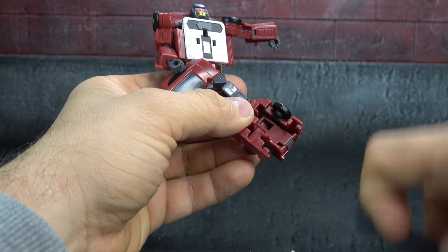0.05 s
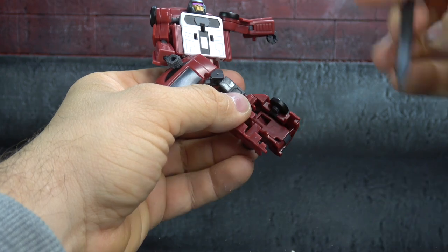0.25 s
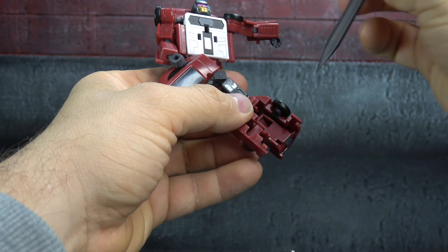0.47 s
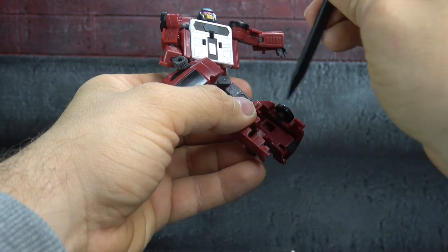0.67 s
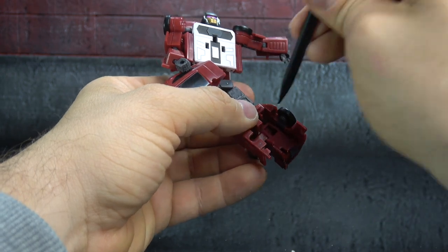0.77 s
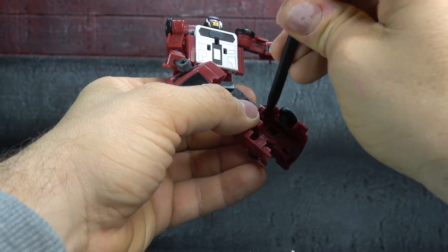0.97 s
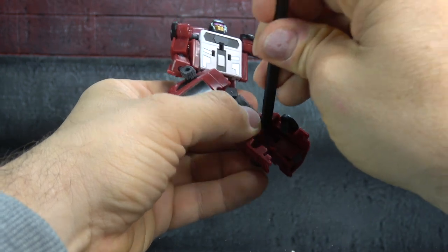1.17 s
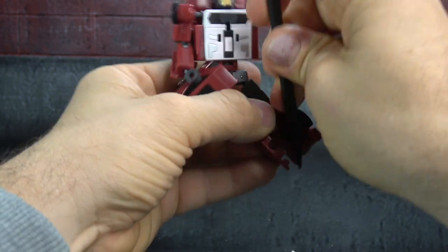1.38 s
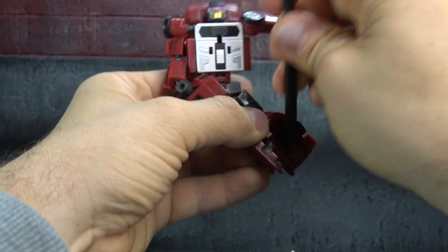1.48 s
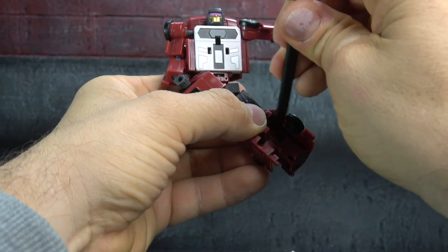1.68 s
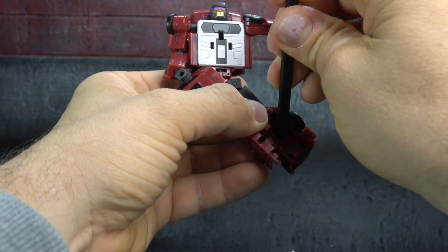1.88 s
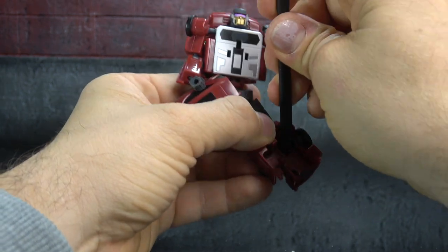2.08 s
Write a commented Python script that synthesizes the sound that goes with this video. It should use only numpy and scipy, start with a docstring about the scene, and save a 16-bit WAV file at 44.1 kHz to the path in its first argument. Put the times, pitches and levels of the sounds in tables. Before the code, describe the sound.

Hard plastic toy leg pried with a pick: faint ticks, one loud snap, then scraping clicks

```python
"""In a small quiet room, close to the microphone, a plastic pick pries at the leg of a hand-held plastic toy
figure. Fingers slide along the pick (coloured noise through its modes) and a fingernail taps; its tip ticks and
scrapes on the hollow foot. Then a tight part snaps free, rings the leg and jolts the hands (low decaying
sines). The part grinds on unevenly (random slips ringing the shell) with smaller clicks and a few dull knocks.
Every contact is a short crack plus decaying modes, weighted and detuned a little differently each time."""
import sys
import numpy as np
from scipy import signal
from scipy.fft import rfft, irfft, next_fast_len
from scipy.io import wavfile
from scipy.ndimage import uniform_filter1d

SR = 44100
rng = np.random.default_rng(int(sys.argv[2]) if len(sys.argv) > 2 else 0)


def unload_wav(signal):
    """Save mono or channel-first audio to the path in sys.argv[1] as 16-bit WAV at rate SR, clipped to [-1, 1]."""
    wavfile.write(
        sys.argv[1],
        SR,
        np.round(np.clip(np.atleast_2d(signal).T, -1, 1) * 32767).astype(np.int16),
    )


N = 94418
TIME = np.arange(N) / SR
HIT_S = .15  # longest ring of one contact
AGE = TIME[:int(HIT_S * SR)]  # seconds since a contact
LEVEL_WINDOW_S = .002  # a click's or knock's level is its energy spread over this window
MODE_SCATTER_DB = 4
GRIPPED_DETUNE, STIFF_DETUNE = .045, .02  # share of a mode's pitch: gripped thin plastic, stiff parts


def amp(db):
    """Decibels to gain."""
    return 10 ** (np.asarray(db) / 20)


def unit(x):
    """Scale to unit energy."""
    return x / np.sqrt(np.sum(x ** 2))


def fade(t, t60):
    """Exponential decay, 60 dB in t60 seconds."""
    return amp(-60 * t / t60)


def add(out, s, x):
    """Mix x into out from s seconds on."""
    i = max(int(s * SR), 0)
    out[i:i + len(x)] += x[:max(N - i, 0)]


def band(x, hz, kind):
    """Gentle low-, high- or band-pass."""
    return signal.sosfilt(signal.butter(2, hz, kind, fs=SR, output="sos"), x)


def log_curve(points, bins, size):
    """Levels in dB at the FFT bins, read along a logarithmic pitch axis through (Hz, dB) points."""
    hz, db = np.array(points, float).T
    bin_hz = np.arange(bins) * SR / size
    return np.interp(np.log(bin_hz + 1), np.log(hz), db)


def colour(x, points):
    """Causal minimum-phase filter through (Hz, dB) points."""
    size = 2 * next_fast_len(len(x))
    cepstrum = irfft(np.log(amp(log_curve(points, size // 2 + 1, size))))
    # folding the cepstrum onto positive time makes the filter causal
    cepstrum[1:size // 2] *= 2
    cepstrum[size // 2 + 1:] = 0
    return irfft(rfft(x, size) * np.exp(rfft(cepstrum)))[:len(x)]


def ring(modes, detune=GRIPPED_DETUNE, count=3):
    """Clusters of close decaying modes; each point of contact weights and detunes them differently."""
    hz, db, t60 = np.repeat(np.array(modes, float), count, axis=0).T[:, :, None]
    scatter_db = MODE_SCATTER_DB * rng.standard_normal(hz.shape)
    weight = amp(db + scatter_db) * rng.choice([-1, 1], hz.shape)
    hz = hz * (1 + detune * rng.uniform(-0.99, 1, hz.shape))
    return unit(np.sum(weight * fade(AGE, t60) * np.sin(2 * np.pi * hz * AGE), axis=0))


def burst(t60):
    """A dense, quickly damped noise burst with an evened spectrum."""
    spectrum = rfft(rng.standard_normal(len(AGE)) * fade(AGE, t60))
    smooth = np.sqrt(uniform_filter1d(np.abs(spectrum) ** 2, size=250))
    return unit(irfft(spectrum / smooth, len(AGE)) * fade(AGE, HIT_S))


# spectrum of the dry crack: pitch_hz [Hz], level_db [dB per Hz, relative]
CRACK_SPECTRUM = [(150, -7), (600, -13), (1200, -11.5), (2000, -14), (3000, -3), (5600, 7), (7000, 2),
                  (8600, 2.5), (12000, -3), (16000, -10)]
CRACK_T60_S = 0.0062  # decay of the noise before its spectrum is evened


def contact(modes, ring_db, body_db, bright_db, edge_db):
    """The plastic's answer to one contact: crack plus modes, hollower, brighter or sharper with the place."""
    crack = unit(colour(burst(CRACK_T60_S), CRACK_SPECTRUM))
    x = crack + amp(ring_db) * ring(modes)
    place = [(500, body_db / 2), (2300, body_db), (4000, 0), (6300, 0.0039), (8300, bright_db), (12000, edge_db)]
    return unit(colour(x, place))


# spectrum of the room's air: pitch_hz [Hz], level_db [dB per Hz, relative]
AIR_SPECTRUM = [(15, -50), (25, 4.5), (180, -2.5), (236, -8.5), (373, -2), (516, -3), (962, -3),
                (1040, -2.5), (1480, -10.5), (2220, -12.5), (2990, -15.5), (6920, -15), (11900, -16.5),
                (16000, -24)]
AIR_DB = -65.5


def air():
    """Steady room noise: white noise coloured to the room's spectrum."""
    x = colour(rng.standard_normal(N), AIR_SPECTRUM)
    return amp(AIR_DB) * x / x.std()


# faint steady tones of the room: pitch_hz [Hz], level_db [dB, RMS]
HUM_TONES = [(498, -78), (1080, -79.5)]


def hum():
    """Constant sines; the square root of two turns RMS level into peak."""
    return sum(amp(db) * np.sqrt(2) * np.sin(2 * np.pi * hz * TIME) for hz, db in HUM_TONES)


# the hands shifting, as a level curve: time_s [s], level_db [dB]
RUSTLE_LEVEL = [(0, -54.5), (.03, -61), (.075, -71), (.125, -61), (.19, -74.5), (.85, -88), (1.14, -67.5),
                (1.3, -70), (1.42, -64.5), (1.65, -72.5), (1.9, -69), (2.14, -69)]


def rustle():
    """The moving hand rustles softly: low band-passed noise riding a level curve."""
    noise = band(rng.standard_normal(N), (120, 380), "bandpass")
    return noise / noise.std() * amp(np.interp(TIME, *np.array(RUSTLE_LEVEL).T))


# spectrum of rubbing skin: pitch_hz [Hz], level_db [dB per Hz, relative]
SKIN_SPECTRUM = [(300, -44), (1500, -5), (3000, 0), (6500, 5), (11000, 3), (16000, -1.5)]
# modes of the pick: pitch_hz [Hz], level_db [dB, relative], t60_s [s]
PICK_MODES = [(3530, 3.5, 0.0067), (4620, 3, 0.012), (4984, 7, 0.017), (8570, 1, 0.011), (11300, 5, 0.015)]
# skin sliding along the pick: strongest_s [s], half_length_s [s], level_db [dB], ring_db [dB against the hiss]
SKIN_SLIDES = [(0.147, 0.046, -55, -25), (0.251, 0.073, -61.5, -14), (0.423, 0.19, -65, -14),
               (0.571, 0.088, -60, -11), (0.599, 0.023, -41, 1), (0.758, 0.045, -52, -31)]
SLIDE_RANGE_DB = 29  # drop from the strongest moment over one half length


def slides():
    """Skin hisses along the pick and makes it sing briefly: swelling noise excites the pick's modes."""
    out = np.zeros(N)
    for s, half, db, ring_db in SKIN_SLIDES:
        hiss = colour(rng.standard_normal(N), SKIN_SPECTRUM)
        hiss *= amp(db - SLIDE_RANGE_DB * np.abs(TIME - s) / half) / hiss.std()
        singing = signal.fftconvolve(hiss, ring(PICK_MODES, STIFF_DETUNE))[:N]
        out += (hiss + amp(ring_db) * singing) / np.hypot(1, amp(ring_db))
    return out


# modes of the shell: pitch_hz [Hz], level_db [dB, relative], t60_s [s]
SHELL_MODES = [(1540, -15, 0.012), (1902, -9.5, 0.033), (2134, -10, 0.036), (3672, 0, 0.031),
               (4660, -5, 0.075), (5290, -2.5, 0.04), (5860, 5.5, 0.048), (6160, 1, 0.034),
               (7450, 0, 0.028), (8550, 3.5, 0.038), (9530, -4, 0.038), (11300, -6, 0.032)]
# fingernail taps, catches and edges striking the plastic: start_s [s], level_db [dB], body_db [dB, hollow body
# around 2 kHz], # bright_db [dB, around 8 kHz], edge_db [dB, above 11 kHz]
CLICKS = [(.1187, -51, -1, 0, 14), (0.126, -50, 9, 7, -5), (0.1387, -46, -7, -2, 18),
          (0.1496, -57, 9, 1, 11), (.351, -55, 19.5, -3, 9), (1.342, -36, 7, 5, 2),
          (1.3488, -45, 4, 2, -8), (1.3574, -25, 13.5, 3, 10.5), (1.3587, -16.5, -23, -0.5, 2),
          (1.3603, -25.5, 3, -1.5, 5), (1.3647, -24, -4, 4, 5), (1.367, -25.5, -2, 3, -7),
          (1.3700, -36, -11, 4, -4), (1.4111, -38, 3, -3, -2), (1.424, -39, -10, -5, 3),
          (1.428, -39.5, 15, 5, -2), (1.431, -37, -2, 11, 7), (1.456, -36, 3, 4, -24),
          (1.466, -38, -1, 18, -13), (1.482, -38.5, -4, 3, -23), (1.4983, -28.5, -5.5, 6.5, -37),
          (1.5115, -30.5, 3, 7.5, -29), (1.5203, -39.5, 1, 2, -5), (1.57, -42, 6, -12, -6),
          (1.5837, -37.5, 7, 13, -4), (1.6992, -39.5, 22, -12, -3), (1.703, -41.5, 19, -10, -12),
          (1.7095, -41, -2, 0, 0), (1.7146, -38, 9, 1, -5), (1.8850, -46, 16, -3, 13),
          (1.8930, -42.5, 10, -6, -16), (1.8946, -37.5, -13, -4, -9), (1.907, -37.5, -6, 0, -10),
          (1.9133, -45.5, 10, -7, -15), (2.0597, -47.5, 5, 6, -2)]
CLICK_RING_DB = -2  # modes against crack


def clicks():
    """Fingernail taps, catches and edges strike the plastic: each click is one crack with the shell's modes."""
    out = np.zeros(N)
    for s, db, body_db, bright_db, edge_db in CLICKS:
        add(out, s, amp(db) * contact(SHELL_MODES, CLICK_RING_DB, body_db, bright_db, edge_db))
    return out * np.sqrt(LEVEL_WINDOW_S * SR)


# knocks of loosely held parts: start_s [s], level_db [dB], pitch_hz [Hz, centre], t60_s [s]
LOOSE_KNOCKS = [(.144, -52, 3280, 0.037), (1.412, -39.5, 1740, 0.045), (1.43, -38.5, 1844, 0.18),
                (1.521, -50, 685, 0.046), (1.535, -42, 1594, 0.035), (1.7027, -44.5, 629, 0.04),
                (1.756, -44, 590, 0.018), (1.7862, -44, 456, 0.088), (1.787, -42, 1019, 0.045),
                (1.798, -48.5, 920, 0.036)]
KNOCK_RING_DB, KNOCK_DB_PER_OCTAVE = -4.5, 17.5  # tone against contact noise; noise slope off the centre
KNOCK_CONTACT_T60_S = 0.048  # decay of the noise before its spectrum is evened


def knocks():
    """Loosely held parts knock, muffled by the hand: noise peaked at one pitch plus a short tone there."""
    out = np.zeros(N)
    for s, db, hz, t60 in LOOSE_KNOCKS:
        slopes = [(hz * 2. ** k, -KNOCK_DB_PER_OCTAVE * abs(k)) for k in range(-4, 5)]
        noise = colour(burst(KNOCK_CONTACT_T60_S), slopes)
        tone = np.sin(2 * np.pi * hz * AGE) * fade(AGE, t60)
        knock = unit(unit(noise) + amp(KNOCK_RING_DB) * unit(tone))
        add(out, s, amp(db) * np.sqrt(LEVEL_WINDOW_S * SR) * knock)
    return out


# modes of the foot under the tip: pitch_hz [Hz], level_db [dB, relative], t60_s [s]
FOOT_MODES = [(1487, -10, 0.034), (2120, 3, 0.015), (2510, -5.5, 0.016), (3330, -10.5, 0.027),
              (5370, -6.5, .012), (6110, 4, 0.013)]
FOOT_BRIGHT_DB = -3.5  # around 8 kHz
# the pick's tip touching the hollow foot: start_s [s], level_db [dB],
# body_db [dB, hollow body around 2 kHz], edge_db [dB, above 11 kHz]
FOOT_TICKS = [(0.9335, -57, 11, -3), (0.9762, -44.5, 1.5, 8.5), (0.982, -47, -9, -20),
              (1.0252, -46.5, 2.5, -6), (1.1432, -49.5, -14, 7.5)]
TICK_RING_DB = -1.5  # modes against crack


def ticks():
    """The pick's tip ticks on the foot: each touch is one crack with the foot's modes."""
    out = np.zeros(N)
    for s, db, body_db, edge_db in FOOT_TICKS:
        add(out, s, amp(db) * contact(FOOT_MODES, TICK_RING_DB, body_db, FOOT_BRIGHT_DB, edge_db))
    return out * np.sqrt(LEVEL_WINDOW_S * SR)


SLIPS_PER_S, CATCHES_PER_S = 1200, 220  # average slips at each point; rate of new catch levels
SCRAPE_RANGE_DB, CATCH_DB = 21.5, 4  # swell from start to strongest; unevenness either way


def scrape(strokes, modes, ring_db, bright_db, points=3):
    """Tiny slips at a few points ring the plastic; each catches and lets go as pressure builds and falls."""
    out = np.zeros(N)
    for start, top, end, db, body_db, edge_db in strokes:
        t = np.arange(start, end, 1 / SR)
        pressure_db = db - SCRAPE_RANGE_DB * np.interp(t, [start, top, end], [1, 0, 1])
        for _ in range(points):
            chance = rng.random(len(t))
            size = rng.standard_normal(len(t))
            catches = rng.uniform(-1.05, 1, SR // 2)
            catch_db = CATCH_DB * np.interp((t - start) * CATCHES_PER_S, np.arange(SR // 2), catches)
            # the gain keeps the summed power independent of slip rate and number of points
            slips = (chance < SLIPS_PER_S / SR) * size * np.sqrt(SR / SLIPS_PER_S / points)
            answer = contact(modes, ring_db, body_db, bright_db, edge_db)
            add(out, start, signal.fftconvolve(slips * amp(pressure_db + catch_db), answer))
    return out


# the pick's tip dragging across the hollow foot: start_s [s], strongest_s [s], end_s [s], level_db [dB],
# body_db [dB, hollow body around 2 kHz], edge_db [dB, above 11 kHz]
FOOT_DRAGS = [(1.04, 1.059, 1.094, -48.5, 3.5, -5), (1.06, 1.083, 1.128, -45, 0.5, -4),
              (1.22, 1.262, 1.35, -64, 3.5, -3), (1.655, 1.664, 1.767, -50, -4, -8)]


def drags():
    """The tip scrapes across the foot: its slips ring the foot's modes, 3.5 dB over the crack."""
    return scrape(FOOT_DRAGS, FOOT_MODES, 3.5, FOOT_BRIGHT_DB)


# the tight part grinding in its seat: start_s [s], strongest_s [s], end_s [s], level_db [dB],
# body_db [dB, hollow body around 2 kHz], edge_db [dB, above 11 kHz]
SEAT_SCRAPES = [(1.322, 1.346, 1.39, -44.5, 13.5, 0), (1.356, 1.365, 1.44, -37, -6, -1.5),
                (1.405, 1.431, 1.548, -39.5, 8, -5), (1.485, 1.514, 1.5575, -38.5, 7.5, -6.5),
                (1.535, 1.585, 1.663, -51, 11.5, -11), (1.68, 1.713, 1.7535, -43.5, 4.5, -17),
                (1.886, 1.898, 1.941, -42.5, -3, -11), (2.045, 2.062, 2.14, -55, 10, 2)]


def grinding():
    """The tight part grinds in its seat: its slips ring the shell's modes, 5.5 dB under the crack."""
    return scrape(SEAT_SCRAPES, SHELL_MODES, -5.5, 0)


# low modes of the whole leg: pitch_hz [Hz], level_db [dB, relative], t60_s [s]
LEG_MODES = [(923, -3, 0.046), (1077, -8, 0.047), (1446, -5, 0.04), (1780, 0, 0.058), (2180, 1.5, 0.037),
             (2530, -10, 0.055)]
SNAP_S, SNAP_DB = 1.359, -30.5  # the tight part breaks free


def snap():
    """The part breaking free rings the whole leg in its low modes, under the snap's own clicks."""
    out = np.zeros(N)
    add(out, SNAP_S, amp(SNAP_DB) * ring(LEG_MODES, STIFF_DETUNE, count=1))
    return out * np.sqrt(LEVEL_WINDOW_S * SR)


# jolts taken up by the hands: start_s [s], level_db [dB, before the thump's slow rise]
HAND_JOLTS = [(1.367, -29.5), (1.416, -39.5), (1.443, -48.5), (1.48, -46.5), (1.525, -44.5), (1.715, -43.5),
              (1.894, -44), (2.06, -50)]
THUMP_HZ, THUMP_T60_S, THUMP_RISE_S = 73.3, 0.078, 0.0045
PALM_HZ, PALM_T60_S, PALM_DB = 325, 0.044, -16  # level against the thump


def jolts():
    """Each jolt gives a low, softly rising thump and a short knock in the palm, both decaying sines."""
    out = np.zeros(N)
    rise = 1 - np.exp(-AGE / THUMP_RISE_S)
    thump = np.sin(2 * np.pi * THUMP_HZ * AGE) * fade(AGE, THUMP_T60_S) * rise
    palm = amp(PALM_DB) * np.sin(2 * np.pi * PALM_HZ * AGE) * fade(AGE, PALM_T60_S)
    for s, db in HAND_JOLTS:
        add(out, s, amp(db) * (thump + palm))
    return out


ROOM_DB, ROOM_GAP_S = -18.5, 0.0072  # reflections against direct sound; silence before the first one
ROOM_T60_S, ROOM_TREBLE_T60_S = 0.29, 0.074


def reflections(dry):
    """Diffuse reflections whose treble dies sooner: the sound convolved with decaying noise."""
    t, noise = TIME[:SR // 2], rng.standard_normal(SR // 2)
    low = band(noise, 4600, "lowpass") * fade(t, ROOM_T60_S)
    treble = band(noise, 4500, "highpass") * fade(t, ROOM_TREBLE_T60_S)
    tail = amp(ROOM_DB) * unit((low - treble) * (t > ROOM_GAP_S))
    return signal.fftconvolve(dry, tail)[:N]


# direct sound, side against mid: pitch_hz [Hz], level_db [dB]
DIRECT_SPREAD = [(60, -23), (250, -7.5), (1000, -11), (2000, -20.5), (5000, -21), (12000, -15.5)]
# left over right: pitch_hz [Hz], level_db [dB]
LEFT_LEAN = [(40, -0.5), (120, 1.3), (1000, 0), (2000, 0.4), (5000, -0.8), (12000, 0)]
ROOM_SIDE_DB, AIR_SIDE_DB, AIR_SIDE_HZ = -32, -7, 130  # side gains; the air's side is high-passed


def scene():
    """The toy sits near the centre; its direct sound, the reflections and the room noise spread a little."""
    handling = rustle() + slides() + knocks() + jolts()
    plastic = clicks() + ticks() + drags() + grinding() + snap()
    dry = handling + plastic
    mid = dry + reflections(dry) + air() + hum()
    air_side = amp(AIR_SIDE_DB) * band(air(), AIR_SIDE_HZ, "highpass")
    diffuse = amp(ROOM_SIDE_DB) * reflections(dry) + air_side
    spread = amp(log_curve(DIRECT_SPREAD, N // 2 + 1, N))
    # a quarter-turn of phase widens the direct sound without moving it
    side = diffuse + irfft(1j * spread * rfft(dry), N)
    left, right = [colour(mid + sign * side, [(hz, sign * lean / 2) for hz, lean in LEFT_LEAN])
                   for sign in (1, -1)]
    return np.array([left, right])


def record(dry):
    """The recorder cuts the top: a steep low-pass at 15.6 kHz."""
    return signal.sosfilt(signal.ellip(8, .2, 80, 15600, fs=SR, output="sos"), dry)


dry = scene()
out = record(dry)
unload_wav(out)
```